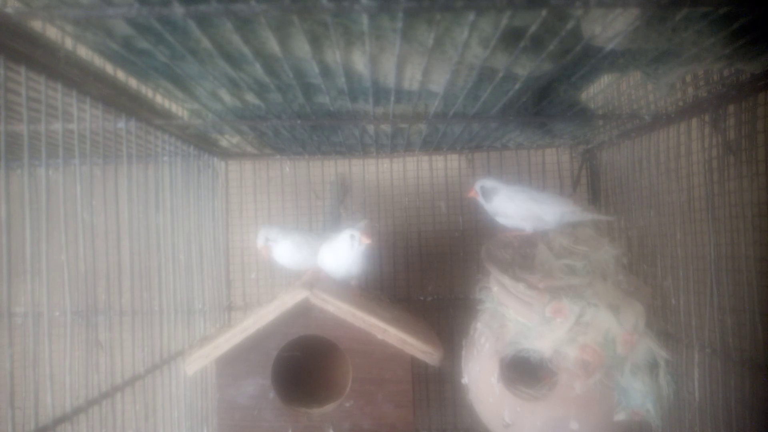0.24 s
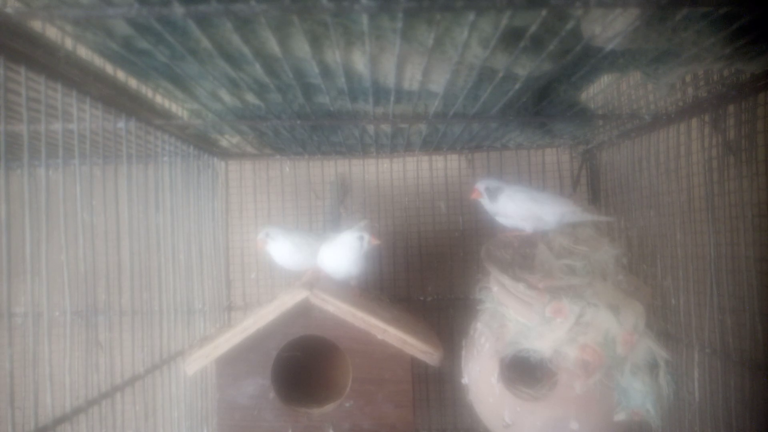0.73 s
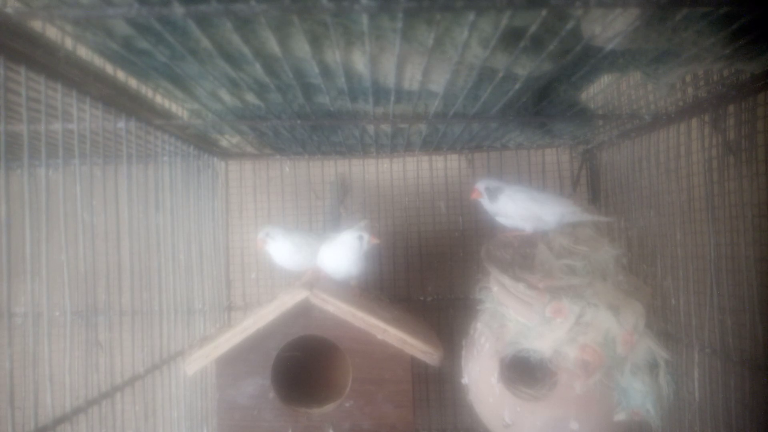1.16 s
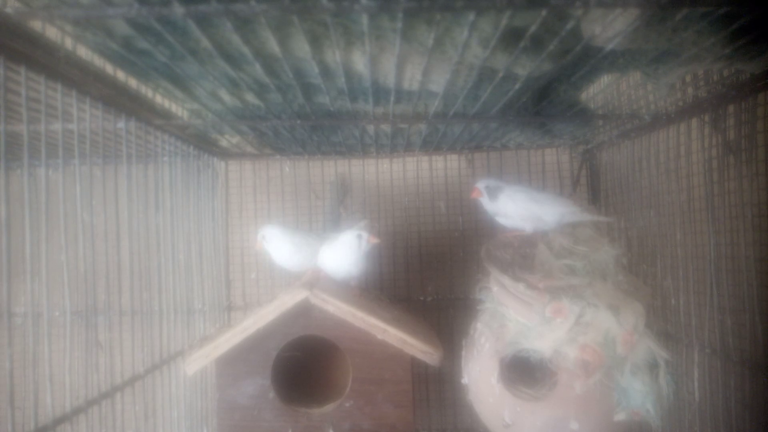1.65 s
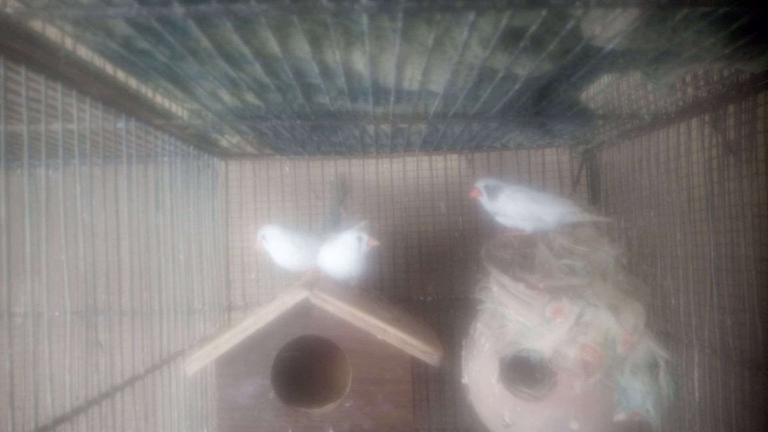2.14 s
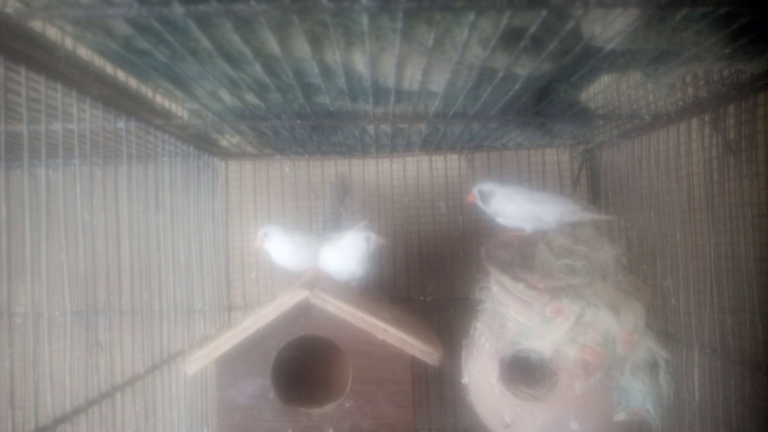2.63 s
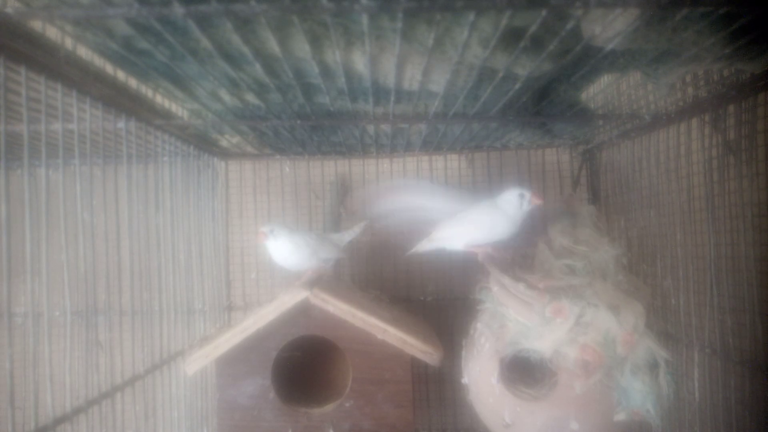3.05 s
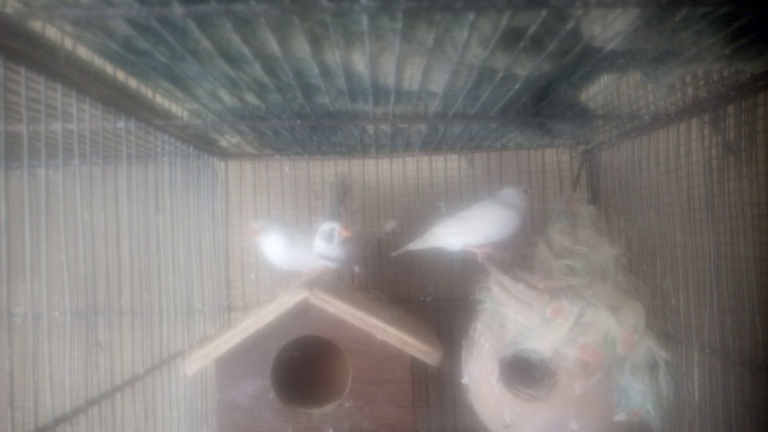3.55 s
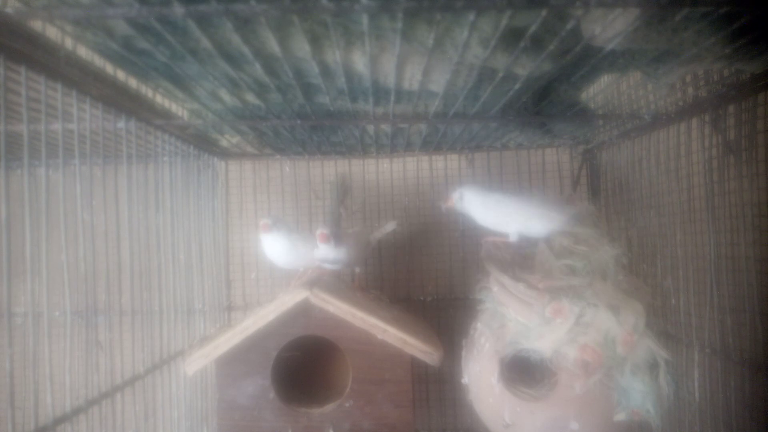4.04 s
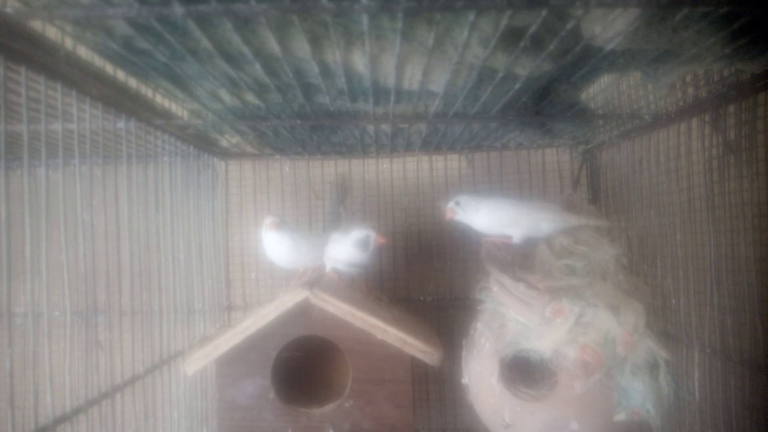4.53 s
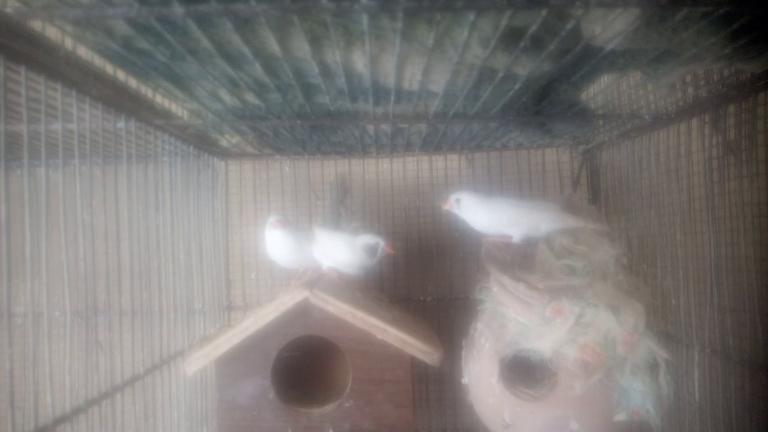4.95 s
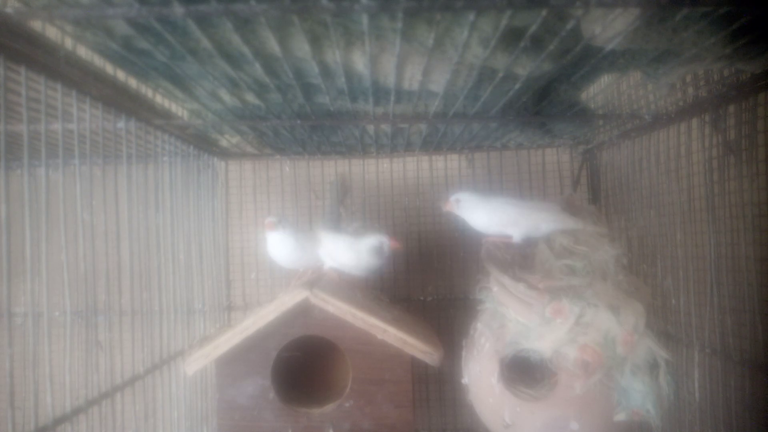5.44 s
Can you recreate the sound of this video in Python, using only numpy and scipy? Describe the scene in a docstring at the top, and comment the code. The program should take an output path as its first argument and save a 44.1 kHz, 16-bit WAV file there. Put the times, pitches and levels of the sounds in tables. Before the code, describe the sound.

Close finch song of buzzes, swooping whistles and fast rattling, followed by sparse chips, rasping calls and soft feather rustles in a quietly humming room.

```python
"""Caged finches in a humming room

Small finches close by: buzzy syllables, swooping whistles and a dry rattle, then sharp chips, two long calls
that break into a rasp, soft nasal calls and a rustle of feathers. The voices are gliding harmonic tones made
chaotic by roughness; the feathers are uneven filtered noise. The room rings briefly over filtered-noise air
and wavering hum tones, and the recorder's limiter ducks everything under the loudest notes."""
import sys
import numpy as np
from scipy import signal
from scipy.fft import rfft, irfft, next_fast_len
from scipy.io import wavfile
from scipy.ndimage import uniform_filter1d, minimum_filter1d

SR = 44100
rng = np.random.default_rng(int(sys.argv[2]) if len(sys.argv) > 2 else 0)


def master_out(mix):
    """Clip the mix to full scale and print it as 16-bit PCM to the path in sys.argv[1]."""
    frames = np.transpose(np.atleast_2d(mix))
    ceiling = np.clip(frames, -1, 1)
    pcm = np.round(ceiling * 32767).astype(np.int16)
    wavfile.write(sys.argv[1], SR, pcm)


N = 251370   # length in samples

# Levels of the single sounds are nominal: fades, trembles, the room and the limiter act on them later.

# room air colour: f/Hz, relative level/dB
AIR_COLOUR = [(20, -35.5), (45, -8.5), (75, 1.5), (118, 1.5), (150, -4.5), (190, -13), (310, -8.5),
              (600, -19), (1100, -18.5), (2000, -19.5), (3000, -40.5), (4700, -25), (6500, -51.5),
              (8000, -68)]
AIR_DB = -40.5
# steady hum tones: f/Hz, level/dB
HUM_TONES = [(75, -46), (100, -57), (120, -51.5), (243, -55.5)]

# throat and beak resonance: f/Hz, gain/dB
BEAK_COLOUR = [(1000, -38.5), (2100, -30.5), (3000, -11.5), (4200, 3), (5000, 10.5), (6400, -12.5),
               (7200, -7), (9500, -11), (13000, -11.5), (16000, -31)]
CUTOFF_HZ = 16200   # top of the voices, the room tail and the final sound

# short pips between the syllables: t/s, length/s, f/Hz, level/dB, roughness 0-1
PIP_NOTES = [(.0, 0.011, 2130, -19, 0.48), (.219, 0.0052, 2140, -12, .35), (.4422, 0.0076, 2077, -4, 0.26),
             (.548, 0.0071, 2105, -2, 0.3), (.626, .0065, 2137, -6.5, 0.25),
             (.708, 0.0057, 2140, -11.5, 0.42), (.791, 0.0047, 2110, -7, 0.21),
             (.837, 0.024, 2320, -27, 0.6), (.956, 0.0052, 2150, -15.5, .2), (1.009, 0.013, 2220, -23, 0.3),
             (1.039, .0045, 2120, -10, .25), (1.952, 0.0083, 2080, -29, 0.4),
             (2.623, 0.008, 2207, -7.5, 0.11), (2.717, 0.0071, 2168, -8.5, 0.37)]
# bend of a pip: pitch ratios at start, middle and end
PIP_BEND = [0.944, 1, 0.916]
# falling slurs from the buzzy syllables into the whistles: t/s, length/s, f/Hz, level/dB, roughness 0-1
SLUR_NOTES = [(.245, .0095, 2400, -3, 0.1), (.343, .0073, 2336, 4.5, 0.04), (.356, .019, 2188, -6, 0.17),
              (.372, .016, 2086, 0, .1)]
# bend of a slur: pitch ratios at start, middle and end
SLUR_BEND = [1.09, 0.97, 0.954]
# the harder a short note is pushed, the more its octave outweighs its fundamental
FULL_PUSH_LIFT_DB, LIFT_LOSS_PER_DB = -23, 0.95

# chips, drawn out into buzzy syllables at the start of the song: t/s, f/Hz, opening level/dB, roughness 0-1,
# flick length/s, top f/Hz, top level/dB, rasp delay/s, rasp level/dB
CHIP_NOTES = [(0.02, 2580, -17, 0.43, 0.023, 6000, -19, 0.047, -14.5),
              (0.132, 2490, -7.5, 0.36, .024, 6450, -12.5, 0.053, -19),
              (0.259, 2433, -4, .36, .014, 6070, -4.5, 0.051, -16),
              (1.039, 2150, -28, 0.25, 0.01, 6820, -28, 0.048, -36),
              (2.776, 2368, -20, 0.18, 0.0067, 6640, -20.5, 0.025, -32),
              (3.155, 2407, -15, 0.17, 0.0052, 6616, -17.5, .014, -21.5),
              (4.132, 2330, -16, 0.14, 0.0044, 6360, -15.5, .022, -20),
              (4.284, 2230, -15, 0.16, 0.0071, 6560, -23, .052, -18.5),
              (5.038, 2474, -20.5, 0.38, 0.00756, 6540, -28, 0.027, -24.5)]
CHIP_LIFT_DB, CHIP_HZ, LIFT_DB_PER_OCTAVE = 5, 2400, -55   # lower chips have a stronger fundamental
# the flick: base level, how far it follows the chip's level in dB, and its delay
FLICK_DB, FLICK_FOLLOWS, FLICK_DELAY_S = -4, 0.43, 0.0105
TOP_S, TOP_ROUGH_SHARE = 0.03, 0.61   # the top note is steadier than the opening

# buzzes of quick upward flicks: t/s, length/s, flick rate/Hz, level/dB
BUZZ_BURSTS = [(0.15, .026, 126, -12), (.268, .014, 150, -10.5), (3.704, .020, 110, -20),
               (5.562, .052, 68, -19.5), (5.617, .088, 96, -26.5)]

# a low swoop that flips up into a whistle: t/s, whistle f/Hz, whistle length/s, whistle level/dB
SWOOP_NOTES = [(0.379, 4810, 0.021, -4), (0.467, 4728, 0.021, 0), (0.563, 4644, 0.024, 1.5),
               (0.661, 4736, 0.023, 0.5), (0.7587, 4763, .019, -0.5), (0.871, 4734, 0.03, -5)]
SWOOP_S, SWOOP_DB, WHISTLE_ROUGH = 0.0125, -13, 0.097

# rattle syllables of two strokes each: t/s, first pip level/dB, second pip level/dB
RATTLE_STROKES = [(1.111, -22, -24), (1.196, -10.5, -40), (1.282, -20, -29), (1.365, -18, -21),
                  (1.453, -7.5, -18.5), (1.537, -11, -21), (1.626, -10, -17), (1.709, -30, -24.5),
                  (1.797, -18, -20), (1.882, -15.5, -9.5), (1.972, -14, -19), (2.06, -9.5, -21),
                  (2.15, -10.5, -5.5), (2.2401, -7, -4.5), (2.3287, -4, -8.5), (2.4157, -4.5, -2.5),
                  (2.513, -1, -6.5)]
# the voice through the rattle, from clear and falling to hoarse and rising:
# t/s, first stroke f/Hz, second stroke f/Hz, end pitch / start pitch, rasp level/dB, roughness 0-1
RATTLE_CONTROLS = [(1.111, 2673, 2210, 0.86, -19, 0.56), (1.2, 2485, 2164, 0.82, -21, .42),
                   (1.365, 2303, 2057, 0.82, -23, 0.28), (1.453, 2420, 2160, .85, -19, 0.3),
                   (1.624, 2580, 2224, 0.84, -21, .35), (1.711, 2625, 2543, 0.88, -19.5, 0.63),
                   (1.796, 1990, 2015, 1.46, -22.5, 0.8), (2.06, 1992, 1997, 1.35, -20.5, 0.63),
                   (2.239, 2056, 2011, 1.09, -23, 0.93), (2.416, 2025, 2056, 1.06, -18.5, 0.94),
                   (2.513, 2152, 2120, 1.09, -20, 0.71)]
STROKE_GAP_S = 0.015
# the fundamental is strong in a clear stroke and fades with roughness, in the pip more than in the rasp
RASP_CLEAR_LIFT_DB, RASP_HOARSE_LOSS_DB = 17.5, 19
PIP_CLEAR_LIFT_DB, PIP_HOARSE_LOSS_DB = 9, 64.5

# feather rustles: t/s, length/s, level/dB, tilt/(dB per octave)
RUSTLE_BURSTS = [(2.803, 0.06, -44.5, 6), (3.087, 0.067, -41, 8.5), (4.556, 0.71, -48, -5),
                 (4.843, 0.083, -52, 0), (5.266, 0.074, -40.5, 1), (5.236, 0.69, -45.5, -5)]
# feather colour before the tilt: f/Hz, relative level/dB
FEATHER_COLOUR = [(100, -13), (400, 0.5), (700, -3), (1150, 4), (2700, -10.5), (4400, -7.5), (6500, -28),
                  (8000, -51.5), (16000, -51)]

# soft nasal calls: t/s, length/s, start f/Hz, end f/Hz, level/dB
NASAL_NOTES = [(2.825, .055, 601, 496, -39.5), (4.5, .100, 521, 441.6, -41)]
# nasal colour: f/Hz, relative level/dB
NASAL_SPECTRUM = [(500, -24), (1000, -5), (1500, -2), (2600, -5.5), (4000, -2), (5000, -6.5), (7000, -32)]

# breakpoints of two long calls, clear at first and then rasping, before the tremble:
# t/s, f/Hz, relative level/dB, roughness 0-1, fundamental lift/dB
LONG_CALL_CURVES = [
    [(3.61, 1706, -25, 0, 19), (3.617, 1817, -19.5, 0.3, 7), (3.62, 2436, -16.5, 0.46, -6.5),
     (3.628, 2137, -9.5, 0.02, 12.5), (3.689, 2102, -5.5, 0, 8), (3.696, 2243, -10.5, 0.56, 0),
     (3.712, 2390, -11, 0.3, -4), (3.721, 2603, -9, .12, -22), (3.732, 2500, -12.5, .26, -14.5),
     (3.768, 2530, -18, 0.24, -9.5)],
    [(5.461, 2640, -0.5, 0.01, -8.5), (5.469, 2232, -13.5, 0.03, 6), (5.497, 2434, 4.5, 0.04, -1),
     (5.506, 2420, -3, 0.14, 1), (5.545, 2430, -1, 0.16, 0), (5.565, 2485, -8.5, 0.25, 3.5),
     (5.62, 2390, -12.5, 0.27, 8.5), (5.635, 2280, -17.5, 0.35, 15), (5.73, 2240, -31, 0.24, 13)],
]
# a hoarse call trembles in pitch and strength; depths at full roughness
TREMBLE_HZ, TREMBLE_PITCH_SHARE, TREMBLE_DB = 95.54, 0.16, 17
# thin high notes from the other side of the syrinx: t/s, length/s, level/dB
OVERTONE_NOTES = [(3.704, 0.054, -23.5), (5.46, 0.016, -31.5), (5.645, .033, -26.5)]
OVERTONE_HZ = 6590

# decay time of the room tail: f/Hz, T60/s
ROOM_DECAY = [(1000, 0.95), (2200, 0.45), (4500, 0.47), (6500, 0.47), (8000, 0.27), (16000, 0.25)]


def from_db(db):
    """Turn decibels into an amplitude factor."""
    return 10 ** (np.asarray(db) / 20)


def rms_one(x):
    """Scale a signal to rms 1."""
    return x / np.sqrt(np.mean(x ** 2) + 1e-20)


def at_hz(points, hz):
    """Read a table along a log-frequency axis."""
    freqs, values = np.transpose(points)
    return np.interp(np.log(np.maximum(hz, 1)), np.log(freqs), values)


def coloured(x, spectrum):
    """Filter a sound through a spectral colour, then level it to rms 1."""
    size = next_fast_len(2 * len(x))
    gain = from_db(at_hz(spectrum, np.fft.rfftfreq(size, 1 / SR)))
    return rms_one(irfft(rfft(x, size) * gain, size)[:len(x)])


def flutter(n, rate_hz):
    """Random motion up to a given rate, with a spread of about 1."""
    lowpass = signal.butter(2, rate_hz, fs=SR, output="sos")
    motion = signal.sosfilt(lowpass, rng.standard_normal(n + SR // 20))
    return rms_one(motion)[-n:]


def swell(n, attack, release):
    """Fade in and out along quarter sines, as the air flow opens and closes."""
    t = np.arange(n) / SR
    opening = np.sin(np.pi / 2 * np.clip(t / attack, 0, 1))
    closing = np.sin(np.pi / 2 * np.clip((n / SR - t) / release, 0, 1))
    return opening * closing


def add(out, s, sound):
    """Mix a sound in at a time in seconds."""
    i = max(round(s * SR), 0)
    out[i:i + len(sound)] += sound[:max(N - i, 0)]


def syrinx(length, pitches, rough, lift_db=0, jitter=0.15, jitter_hz=700, quiver=0.062,
           shimmer_db=6, slope_db=-18, hiss=0.17, low_cut_hz=1800):
    """One note: a gliding harmonic tone, more chaotic in pitch and strength with roughness, beak-shaped."""
    n = max(int(length * SR), SR // 500)
    if len(pitches) == n:
        glide = pitches
    else:
        # a smooth curve through the few given pitches
        curve = np.polyfit(np.linspace(0, 1, len(pitches)), pitches, len(pitches) - 1)
        glide = np.polyval(curve, np.linspace(0, 1, n))
    wobble = jitter * flutter(n, jitter_hz) + quiver * flutter(n, 160)
    phase = 2 * np.pi * np.cumsum(glide * (1 + rough * (wobble - wobble.mean()))) / SR

    k = np.arange(1, 8)[:, None]   # harmonic numbers; slope_db is per octave, the lift is for the first
    partials_db = slope_db * np.log2(k) + at_hz(BEAK_COLOUR, k * glide) + lift_db * (k == 1)
    partials = from_db(partials_db) * (k * glide < CUTOFF_HZ)
    # even out the strength along the glide, so that only the balance of harmonics moves
    tone = (partials * np.sin(k * phase)).sum(axis=0) / np.sqrt((partials ** 2).sum(axis=0))
    tone = rms_one(tone * from_db(shimmer_db * rough * flutter(n, 400)))

    turbulence = hiss * rough ** 2 * coloured(rng.standard_normal(n), BEAK_COLOUR)
    note = (tone + turbulence) * swell(n, 0.0022, 0.0025 + 0.034 * length)
    # so small a throat radiates little low sound
    low_cut = signal.butter(4, low_cut_hz, "high", fs=SR, output="sos")
    note = signal.sosfilt(low_cut, np.pad(note, (0, SR // 500)))
    return note / np.sqrt(np.sum(note ** 2) / n)


def background():
    """Noise coloured as room air, over hum tones that waver in phase and strength."""
    t = np.arange(N) / SR
    hum = np.zeros(N)
    for hz, db in HUM_TONES:
        tone = np.sin(2 * np.pi * hz * t + 0.51 * flutter(N, 11))
        hum += from_db(db) * rms_one(tone * (1 + 0.81 * flutter(N, 8.6)))
    air = from_db(AIR_DB) * coloured(rng.standard_normal(N), AIR_COLOUR)
    return hum + air


def short_notes(notes, bend):
    """Brief syrinx notes that share one bend of pitch and lose fundamental as they get louder."""
    out = np.zeros(N)
    for s, length, hz, db, rough in notes:
        lift_db = FULL_PUSH_LIFT_DB - LIFT_LOSS_PER_DB * db
        note = syrinx(length, hz * np.array(bend), rough, lift_db, slope_db=-19.5)
        add(out, s, from_db(db) * note)
    return out


def pips():
    """Short syrinx notes whose pitch arches up and then down."""
    return short_notes(PIP_NOTES, PIP_BEND)


def chips():
    """An opening note, a rough upward flick, a thin fading top note and a trailing rasp, all overlapping."""
    out = np.zeros(N)
    for s, hz, db, rough, flick_length, top_hz, top_db, delay, rasp_db in CHIP_NOTES:
        lift_db = CHIP_LIFT_DB + LIFT_DB_PER_OCTAVE * np.log2(hz / CHIP_HZ)
        opening = syrinx(0.012, [hz * 1.06, hz * 0.97, hz], rough, lift_db)
        add(out, s, from_db(db) * opening * swell(len(opening), 0.0023, 0.001))

        flick = syrinx(flick_length, [3850, 4750, 6100], rough=0.76, lift_db=4.5)
        add(out, s + FLICK_DELAY_S, from_db(FLICK_DB + FLICK_FOLLOWS * db) * flick)

        top = syrinx(TOP_S, [top_hz, top_hz * 0.99], TOP_ROUGH_SHARE * rough, slope_db=-30.5)
        add(out, s + 0.013, from_db(top_db) * top * np.linspace(1.3, 0.5, len(top)))

        rasp = syrinx(0.02, [2380, 2230], rough=0.4, lift_db=2.5)
        add(out, s + delay, from_db(rasp_db) * rasp)
    return out


def buzzes():
    """The syrinx snaps open in rapid succession, each time with a quick upward flick."""
    out = np.zeros(N)
    for s, length, rate, db in BUZZ_BURSTS:
        for start in s + np.arange(0, length, 1 / rate):
            late, louder_db = rng.normal(0, [0.0008, 2.0])   # spread in s and dB
            flick = syrinx(0.004, [3100, 4200, 5900], rough=0.25)
            add(out, start + late, from_db(db + louder_db) * flick)
    return out


def slurs():
    """Short syrinx notes that fall in pitch."""
    return short_notes(SLUR_NOTES, SLUR_BEND)


def whistles():
    """The pitch dips, springs back, then runs into a slightly rising whistle that fades."""
    out = np.zeros(N)
    for s, hz, length, db in SWOOP_NOTES:
        swoop = syrinx(SWOOP_S, [4070, 3336, 2776, 3730], rough=0.21, slope_db=-21)
        add(out, s, from_db(SWOOP_DB) * swoop * np.linspace(1.3, 0.7, len(swoop)))

        whistle = syrinx(length, [hz * 0.985, hz * 0.995, hz * 1.043], WHISTLE_ROUGH, slope_db=-8.5)
        fade = np.linspace(1.2, 0.55, len(whistle))
        add(out, s + SWOOP_S - 0.001, from_db(db) * whistle * fade)   # overlaps the swoop by 1 ms
    return out


def rattle(pip_length=0.00603, rasp_length=0.015, rasp_lag=0.001124, rasp_fade_db=9):
    """Each stroke is a spindle-shaped pip running into a fading glide, falling at first, hoarse and rising later."""
    out = np.zeros(N)
    times, *voice = np.transpose(RATTLE_CONTROLS)
    for s, first_db, second_db in RATTLE_STROKES:
        first_hz, second_hz, glide, rasp_db, rough = [np.interp(s, times, control) for control in voice]
        rasp_lift_db = RASP_CLEAR_LIFT_DB - RASP_HOARSE_LOSS_DB * rough
        pip_lift_db = PIP_CLEAR_LIFT_DB - PIP_HOARSE_LOSS_DB * rough
        strokes = [(s, first_hz, first_db, 0.1), (s + STROKE_GAP_S, second_hz, second_db, 0.25)]
        for start, hz, pip_db, pip_rough in strokes:
            pip = syrinx(pip_length, [hz, hz], pip_rough, pip_lift_db, slope_db=-26)
            add(out, start + 0.00054, from_db(pip_db) * pip * np.hanning(len(pip)) ** 2)

            rasp = syrinx(rasp_length, [hz, hz * glide], rough, rasp_lift_db, slope_db=-14.5, low_cut_hz=2070)
            fade_db = rasp_fade_db * np.linspace(0.5, -0.5, len(rasp))
            add(out, start + rasp_lag, from_db(rasp_db + fade_db) * rasp)
    return out


def feathers():
    """Friction noise of randomly uneven strength, rustling as the birds shift about."""
    out = np.zeros(N)
    for s, length, db, tilt in RUSTLE_BURSTS:
        n = int(length * SR)
        friction = rng.standard_normal(n) * from_db(2.95 * flutter(n, 150))
        colour = [(hz, level + tilt * np.log2(hz)) for hz, level in FEATHER_COLOUR]
        add(out, s, from_db(db) * coloured(friction, colour) * swell(n, length / 3, length / 2))
    return out


def nasal_calls():
    """Quiet low stacks of harmonics that sag in pitch, through a nasal colour."""
    out = np.zeros(N)
    for s, length, start_hz, end_hz, db in NASAL_NOTES:
        n = int(length * SR)
        hz = np.linspace(start_hz, end_hz, n) * (1 + 0.006 * flutter(n, 200))
        phase = 2 * np.pi * np.cumsum(hz) / SR
        stack = sum(np.sin(k * phase) for k in range(1, 15))
        add(out, s, from_db(db) * coloured(stack, NASAL_SPECTRUM) * swell(n, 0.01, 0.0047))
    return out


def long_calls():
    """One held note each, trembling where it is hoarse, with a thin second voice above it."""
    out = np.zeros(N)
    for call in LONG_CALL_CURVES:
        s, *controls = np.transpose(call)
        length = s[-1] - s[0]
        t = s[0] + np.arange(int(length * SR)) / SR
        hz, db, rough, lift_db = [np.interp(t, s, control) for control in controls]
        tremble = rough * np.sin(2 * np.pi * TREMBLE_HZ * t + flutter(len(t), 28))
        note = syrinx(length, hz * (1 + TREMBLE_PITCH_SHARE * tremble), rough, lift_db, slope_db=-15.5)
        add(out, s[0], from_db(db + TREMBLE_DB * tremble) * note[:len(t)])
    for s, length, db in OVERTONE_NOTES:
        overtone = syrinx(length, [OVERTONE_HZ, OVERTONE_HZ * 0.99], rough=0.073, lift_db=8.5)
        add(out, s, from_db(db) * overtone)
    return out


def room(x, tail_db=-11, early_db=-7, early_t60=0.094, first_echo=0.002):
    """Quick echoes off the cage and near walls, and a diffuse tail that dies sooner in the treble."""
    t = np.arange(SR * 3 // 4) / SR
    edges = np.geomspace(500, CUTOFF_HZ, 11)
    tail = 0
    for low, high in zip(edges, edges[1:]):
        bandpass = signal.butter(2, [low, high], "band", fs=SR, output="sos")
        band = signal.sosfilt(bandpass, rng.standard_normal(len(t)))
        tail = tail + band * from_db(-60 * t / at_hz(ROOM_DECAY, np.sqrt(low * high)))
    tail = tail * np.clip(t / 0.0054, 0, 1)

    # sparse random echoes, about 2500 a second
    echoes = rng.standard_normal(len(t)) * (rng.random(len(t)) < 2500 / SR)
    early = echoes * (t > first_echo) * np.exp(-np.log(1000) * t / early_t60)

    response = from_db(tail_db) * tail / np.linalg.norm(tail)
    response = response + from_db(early_db) * early / np.linalg.norm(early)
    return x + signal.fftconvolve(x, response)[:N]


def scene():
    """Birds and feathers ring in the room; air and hum are laid underneath."""
    song = pips() + slurs() + whistles() + rattle()
    birds = song + chips() + long_calls() + buzzes() + nasal_calls() + feathers()
    return (room(birds) + background())[None]


def limiter(x, ceiling_db=-5.0, release_db_per_s=90):
    """The gain drops almost at once on a peak above the ceiling and creeps back."""
    recovery = release_db_per_s * np.arange(N) / SR
    over_db = np.maximum(20 * np.log10(np.abs(x).max(axis=0) + 1e-9) - ceiling_db, 0)
    held_db = np.maximum.accumulate(over_db + recovery) - recovery
    # dip slightly ahead of the peak, with rounded corners
    gain_db = uniform_filter1d(minimum_filter1d(-held_db, size=61), size=61)
    return x * from_db(gain_db)


def record(dry, knee_hz=6900, leak_db=-13):
    """The microphone drops steeply in the high treble; a limiter holds the peaks; the top is cut."""
    below_knee = signal.butter(16, knee_hz, fs=SR, output="sos")
    above_knee = signal.butter(8, knee_hz * 1.015, "high", fs=SR, output="sos")
    heard = signal.sosfilt(below_knee, dry) + from_db(leak_db) * signal.sosfilt(above_knee, dry)
    top_cut = signal.cheby2(12, 70, CUTOFF_HZ, fs=SR, output="sos")
    return signal.sosfilt(top_cut, limiter(heard))


dry = scene()
out = record(dry)
master_out(out)
```